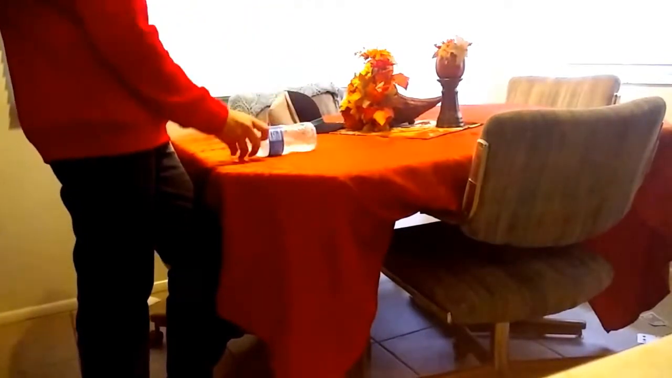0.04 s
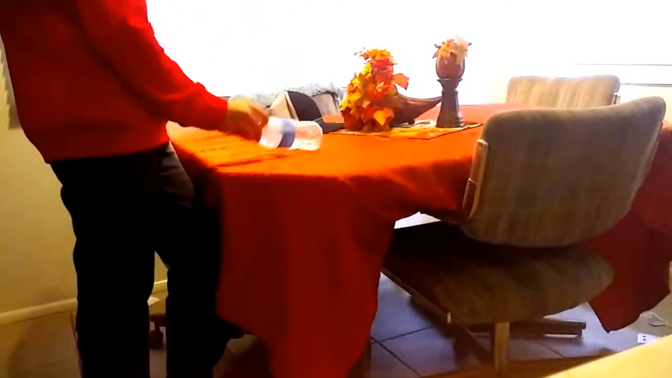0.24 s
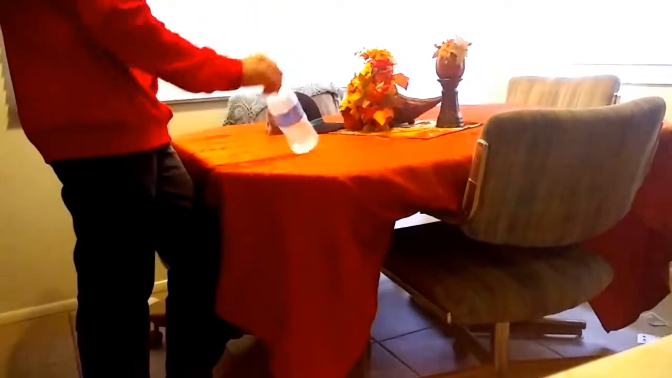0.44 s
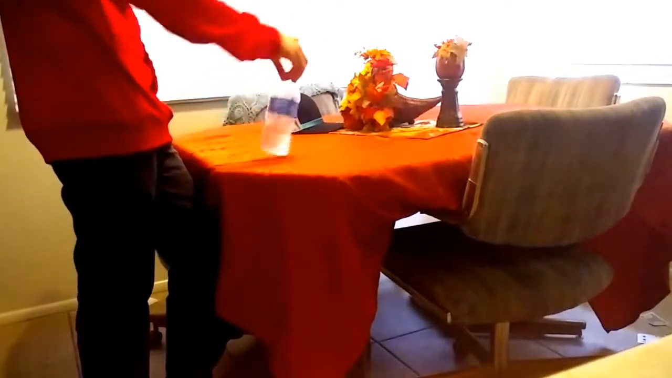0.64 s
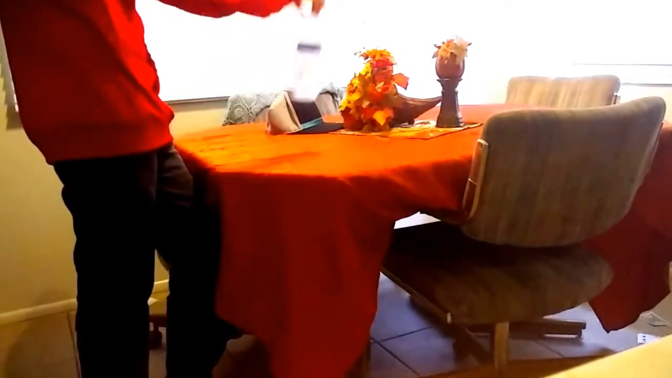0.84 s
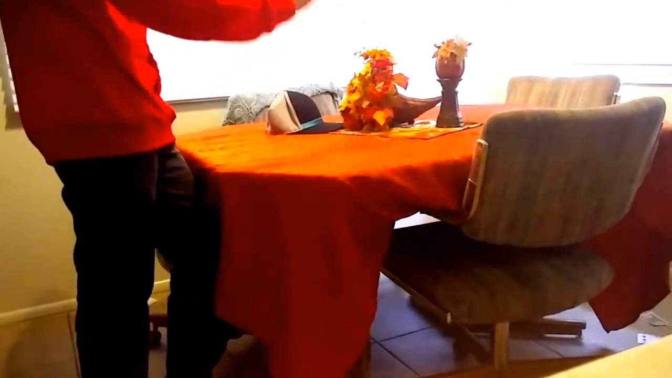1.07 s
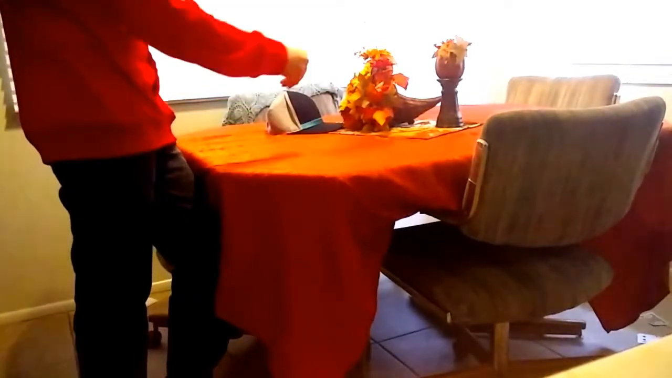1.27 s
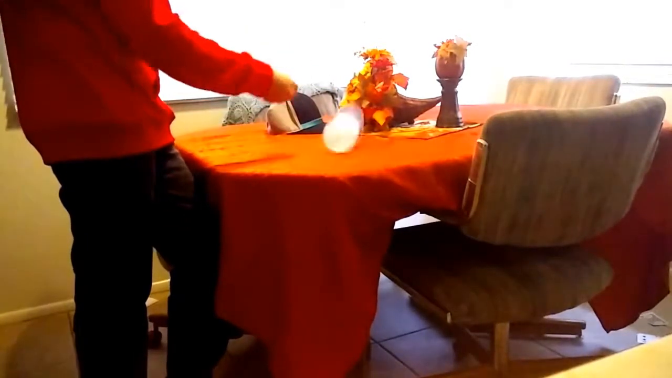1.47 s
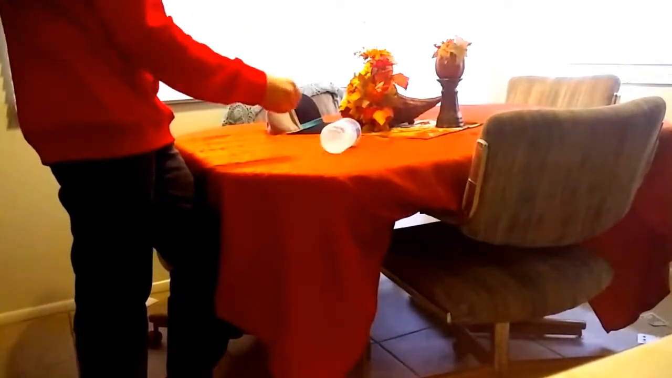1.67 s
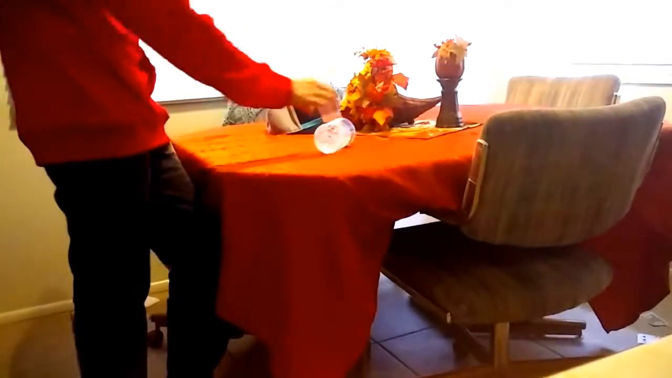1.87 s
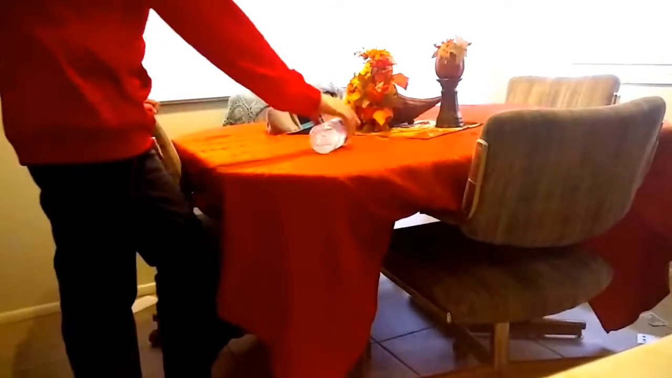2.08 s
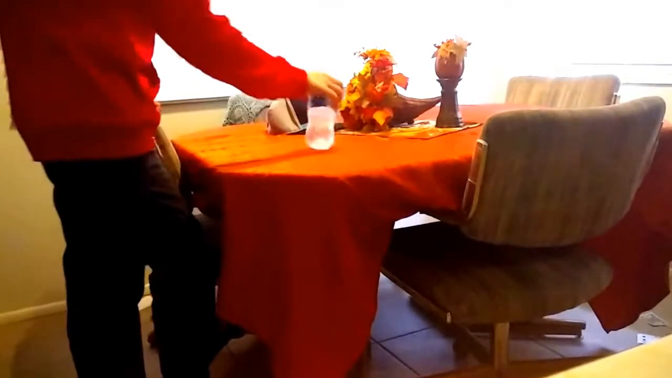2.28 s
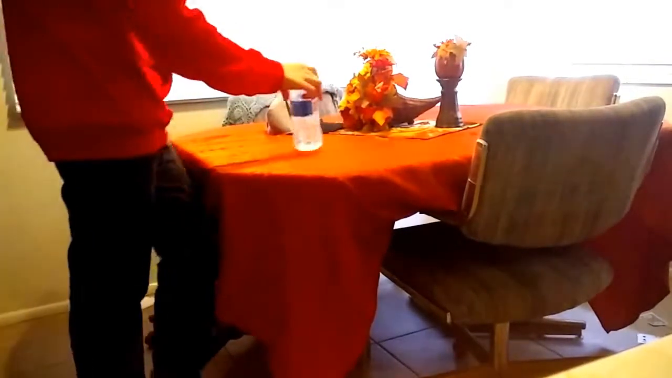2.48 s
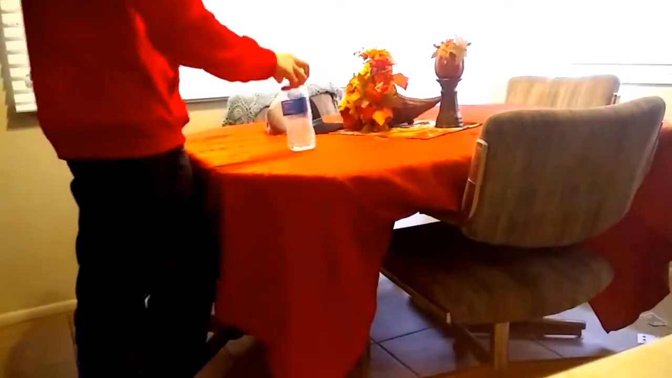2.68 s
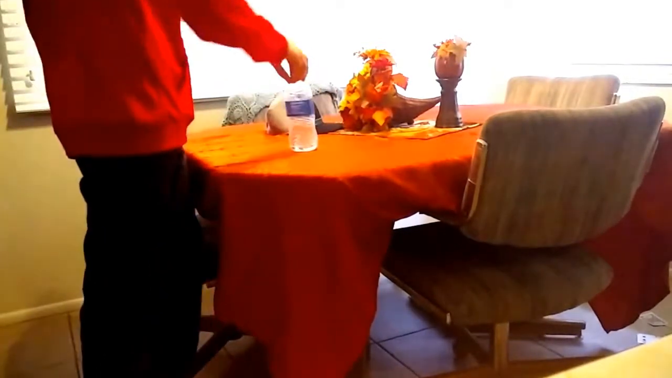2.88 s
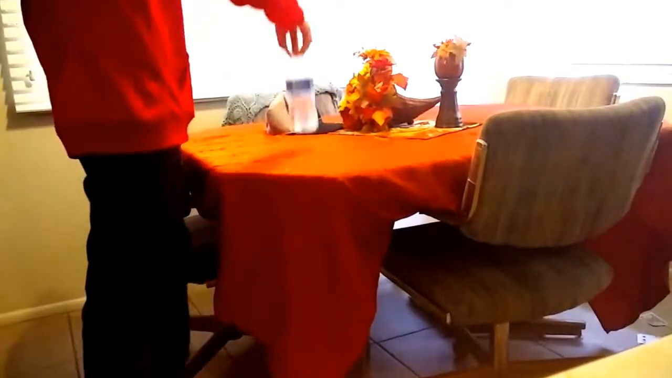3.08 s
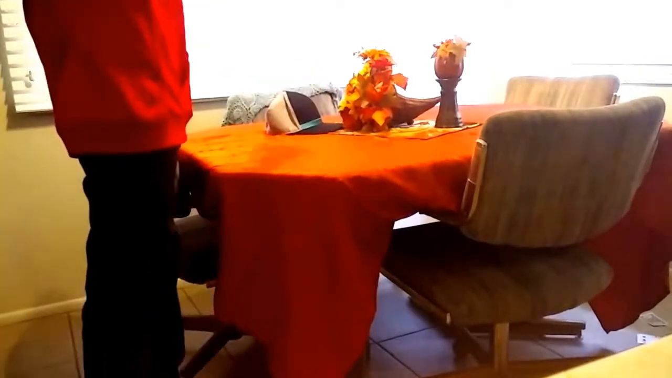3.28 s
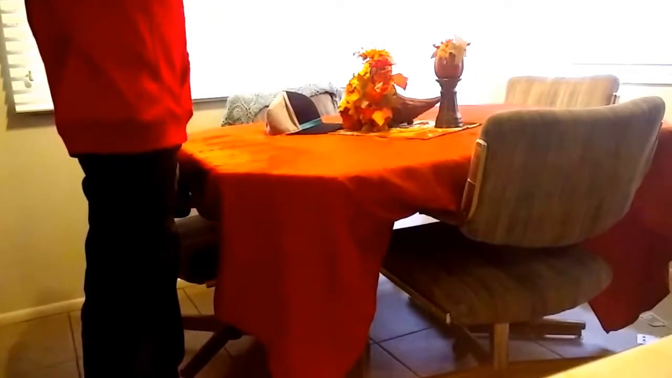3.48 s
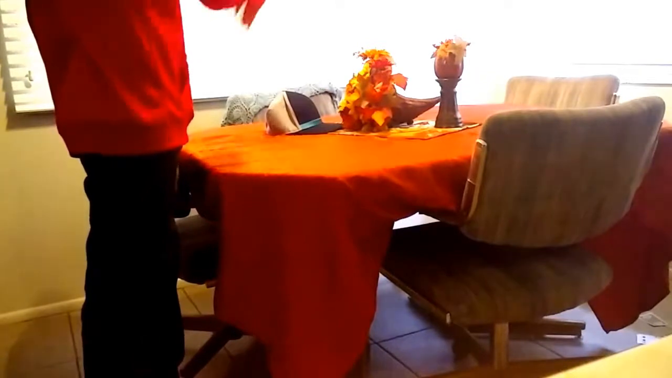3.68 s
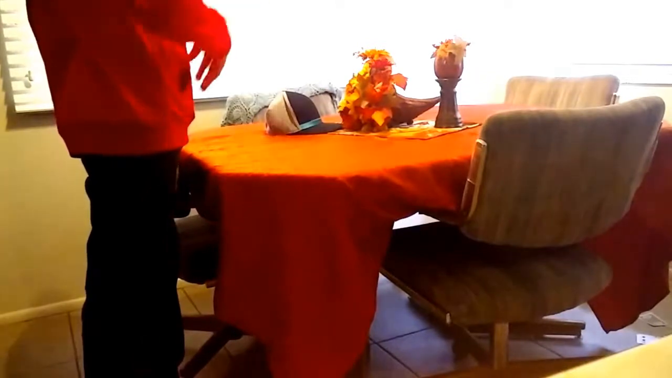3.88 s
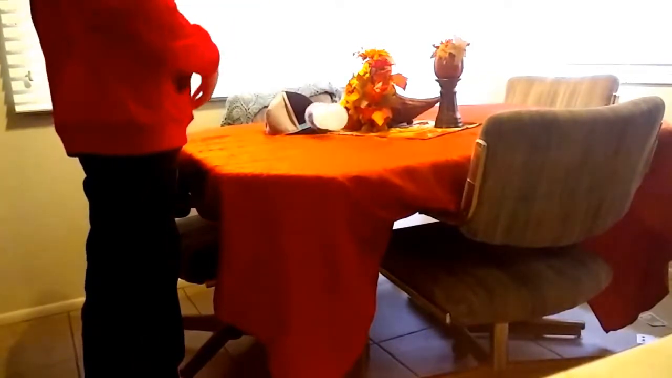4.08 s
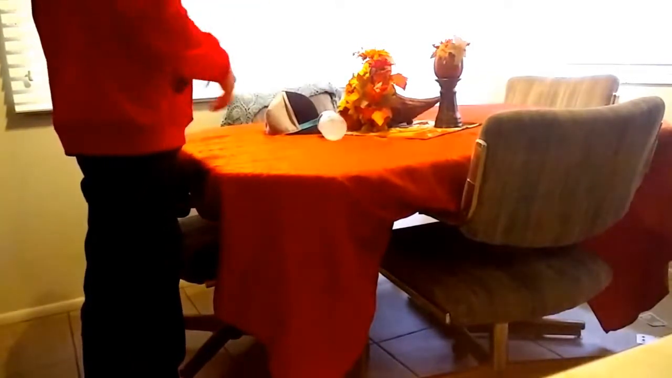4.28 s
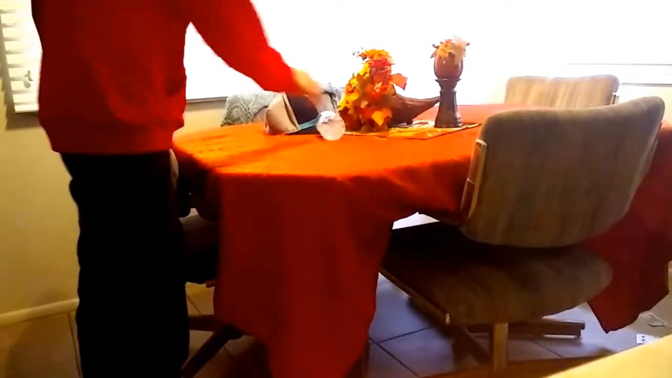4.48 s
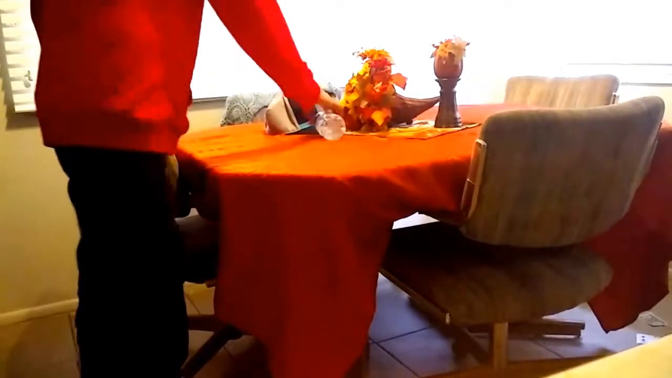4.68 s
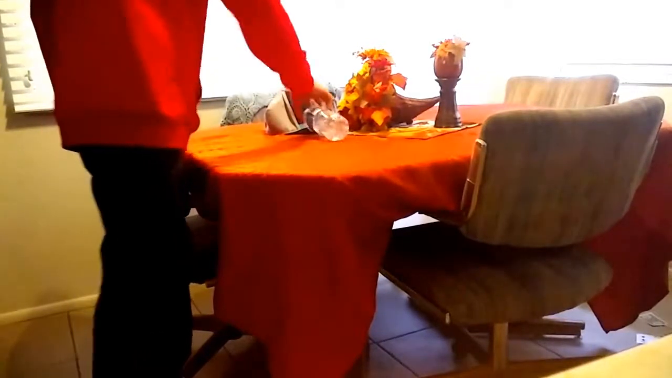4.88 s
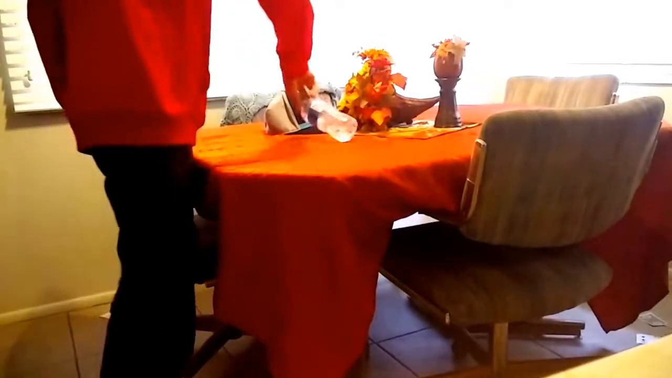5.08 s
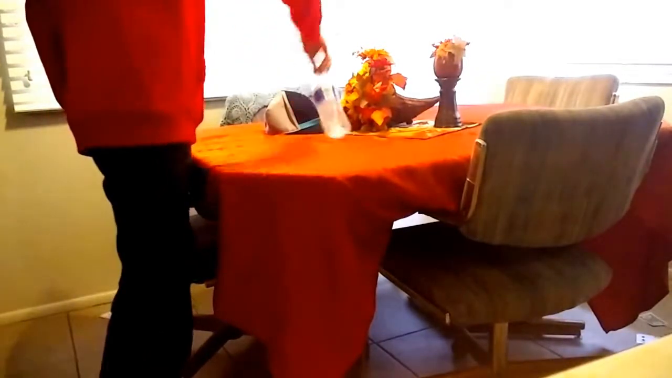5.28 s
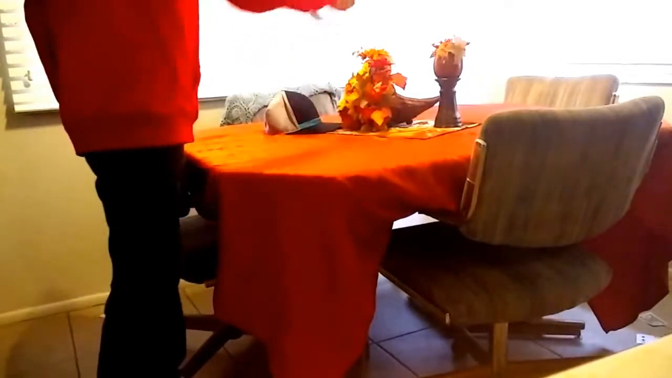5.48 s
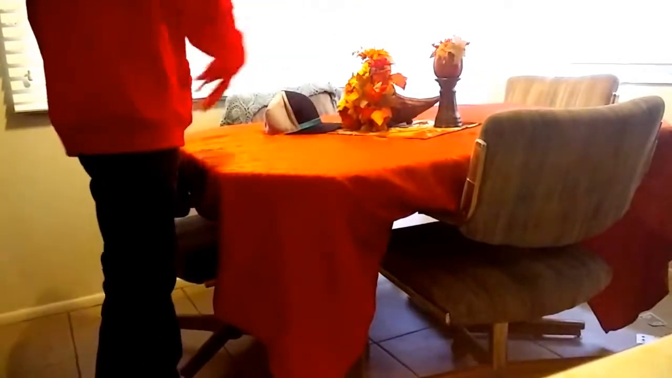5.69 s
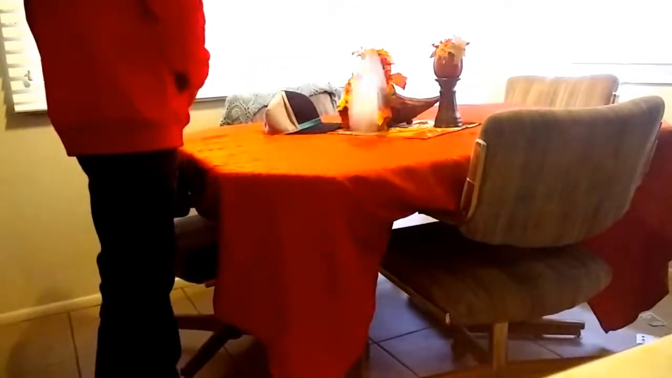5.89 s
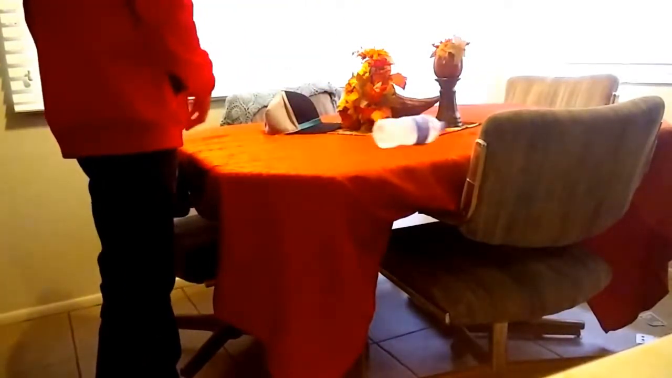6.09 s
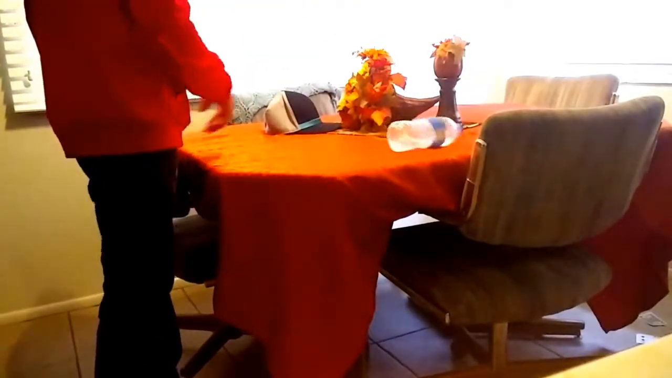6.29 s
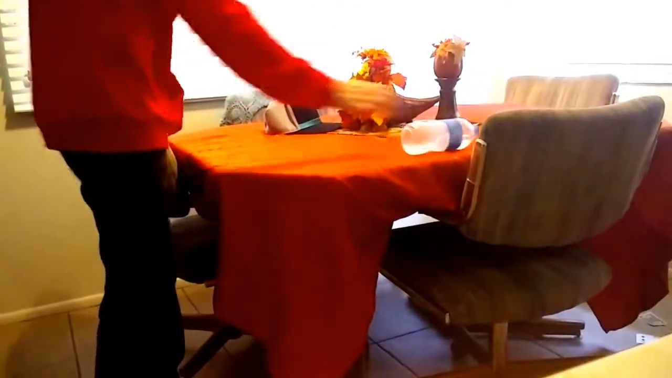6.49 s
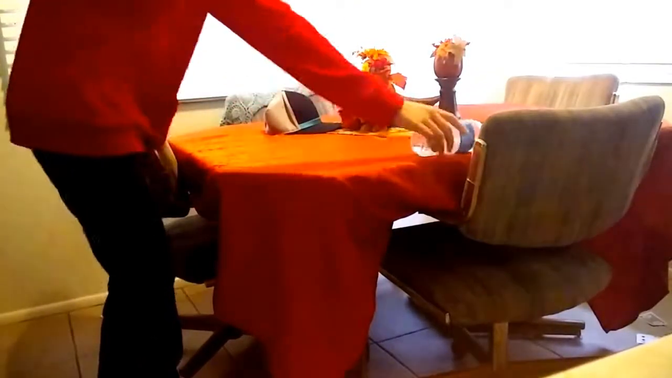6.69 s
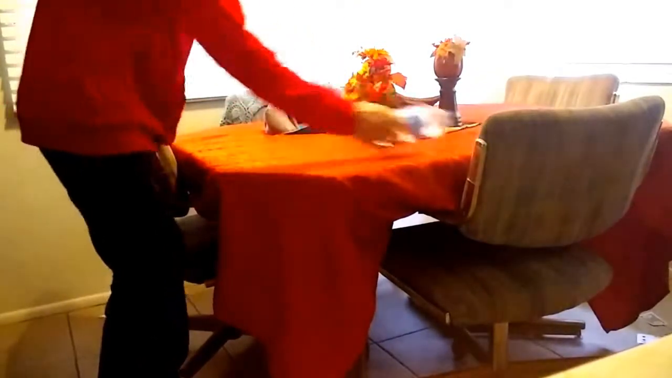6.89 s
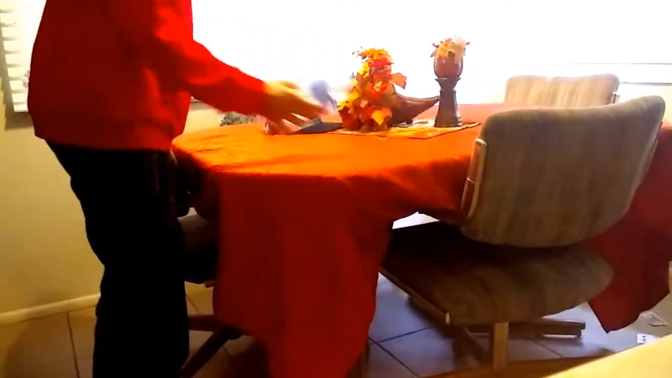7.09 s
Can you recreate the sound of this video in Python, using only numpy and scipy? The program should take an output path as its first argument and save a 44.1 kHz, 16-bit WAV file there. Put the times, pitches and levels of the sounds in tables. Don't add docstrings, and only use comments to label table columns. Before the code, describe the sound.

Three bottle flips in a reflective tiled dining room, heard from a distance by a small, hissy microphone. Each landing is a hard, hollow thud of water, plastic and wooden table, the last two with a quick bounce. Between them come faint crinkles, wall pops, light taps, trickling slosh and glugs. Low house rumble lies beneath, with a thin electric whine and quick regular ticks early on.

```python
import sys
import numpy as np
from scipy import signal
from scipy.fft import rfft, irfft
from scipy.io import wavfile
from scipy.ndimage import uniform_filter1d

SR = 44100
rng = np.random.default_rng(int(sys.argv[2]) if len(sys.argv) > 2 else 0)


def how_loud(loudness_db):
    steps = np.asarray(loudness_db, float) / 20
    return 10 ** steps


def wav_out(sig):
    wavfile.write(sys.argv[1], SR, np.round(np.clip(np.atleast_2d(sig).T, -1, 1) * 32767).astype(np.int16))


N = 314874


def evened(x):
    return x / np.sqrt(np.mean(x ** 2) + 1e-20)


def read(points, hz):
    f, value = np.transpose(points)
    return np.interp(np.log(hz + 1), np.log(f + 1), value)


def add(mix, s, sound):
    part = mix[round(s * SR):][:len(sound)]
    part += sound[:len(part)]


def coloured(x, points):
    log_gain = np.log(how_loud(read(points, np.fft.rfftfreq(4096, 1 / SR))))
    circle = np.concatenate([log_gain, log_gain[-2:0:-1]])
    taps = np.fft.ifft(np.exp(circle - 1j * signal.hilbert(circle).imag)).real
    return signal.fftconvolve(x, taps)


def noise(points, patchy_db):
    a, b, patches = rng.standard_normal((N // 256 + 5, 513, 3)).T
    patches = uniform_filter1d(patches, size=10, axis=0)
    patches = evened(uniform_filter1d(patches, size=12, axis=1))
    gain_db = read(points, np.fft.rfftfreq(1024, 1 / SR))[:, None]
    z = (a + 1j * b) * how_loud(gain_db + patchy_db * patches)
    return evened(signal.istft(z, nperseg=1024, noverlap=768)[1][:N])


# f/Hz, T60/s
ROOM = [(60, 0.55), (160, 0.34), (420, 0.34), (1100, 0.33), (2910, 0.36), (7680, 0.33)]


def room(x, direct_db=-11, late_db=-16, slower=1.75):
    hz, t, z = signal.stft(rng.standard_normal(SR * 3 // 4), SR, nperseg=256)
    t60 = read(ROOM, hz)[:, None]
    filling = 1 - np.exp(-(t + 0.0015) / (0.0023 + 1.0 / (hz[:, None] + 100)))
    decay = how_loud(-60 * t / t60) + how_loud(late_db - 60 * t / t60 / slower)
    tail = signal.istft(z * filling * decay, SR, nperseg=256)[1]
    seconds = np.arange(len(tail)) / SR
    tail *= np.clip(seconds / .0008, 0, 1) / np.linalg.norm(tail)
    early = np.exp(-seconds / .08)
    clumps = np.repeat(rng.standard_normal(len(tail) // 90 + 1), 90)[:len(tail)]
    tail *= how_loud(3.0 * early * uniform_filter1d(clumps, size=40))
    tail[0] += how_loud(direct_db)
    return signal.fftconvolve(x, tail)


# f/Hz, level/dB per Hz
RUMBLE = [(15, -58.5), (25, -38), (48, -14), (113, -10), (147, -23.5), (229, -1.5), (351, -11.5),
          (385, -13), (488, -11.5), (944, -17), (1010, -19), (1140, -21), (2050, -25), (2200, -24),
          (7000, -39), (9100, -72.5), (15400, -120)]
# f/Hz, level/dB
HUM = [(59.2, -81.5), (118.4, -76), (177.6, -77), (479, -84)]


def house():
    t = np.arange(N) / SR
    hum = sum(np.sqrt(2) * how_loud(db) * np.sin(2 * np.pi * (hz * t + rng.random())) for hz, db in HUM)
    return how_loud(-61.5) * noise(RUMBLE, patchy_db=2.37) + hum


def leak_db(t):
    warm_db, warm_s = 3.5, 0.17
    dropout_s, dropout_length_s, cut_s = .46, .09, 4.11
    gap = (t > dropout_s) & (t < dropout_s + dropout_length_s)
    sag = 1.65 * np.minimum(t, cut_s)
    return 5 - sag + warm_db * np.exp(-t / warm_s) - 9 * gap - 18 * (t > cut_s)


# f/Hz, level/dB per Hz
HISS = [(1470, -28), (2500, -1.5), (3300, -6), (3560, -3), (4660, -14.5), (5070, -7.5), (8960, -4.5),
        (12300, -11), (15700, -6.5)]


def hiss():
    strong_leak = np.maximum(leak_db(np.arange(N) / SR), 0)
    return how_loud(-75.5 + uniform_filter1d(strong_leak, size=8000)) * noise(HISS, patchy_db=1.2)


# f/(1000.2 Hz), level/dB
WHINE = [(1, -85), (2, -84), (7, -95.5), (8, -99.5), (9, -90.5), (10, -91.5), (13, -90.5), (14, -95.5),
         (15, -98)]


def clock_whine():
    t = np.arange(N) / SR
    flutter = 1 + 0.25 * evened(uniform_filter1d(rng.standard_normal(N), size=300))
    whine = sum(np.sqrt(2) * how_loud(db) * np.sin(2 * np.pi * (round(k) * 1000.2 * t + rng.random()))
                for k, db in WHINE)
    return how_loud(leak_db(t)) * flutter * whine


def clock_ticks():
    first_s, every_s, last_s, weak_after_s = .0165, .08, 2.75, 1.9
    level_db, spread_db, weak_db = -61, 1.5, -11
    times = np.arange(first_s, last_s, every_s)
    levels = level_db + spread_db * rng.standard_normal(len(times)) + weak_db * (times > weak_after_s)
    stray = (2.2558, -57.5)  # t/s, level/dB
    out = how_loud(leak_db(np.arange(N) / SR) - 84.5) * rng.standard_normal(N)
    for s, db in [*zip(times, levels), stray]:
        add(out, s, how_loud(db) * rng.standard_normal(500) * np.exp(-np.arange(500) / SR / .004))
    return signal.sosfilt(signal.butter(2, 6500, "high", fs=SR, output="sos"), out)


def camera():
    return hiss() + clock_whine() + clock_ticks()


# f/Hz, level/dB per Hz
FADING = [(35, -61), (60, -62), (206, -6), (790, -3), (1500, -8.5), (1840, -16), (3900, -16), (5620, -29),
          (14000, -59)]


def earlier_landing():
    fade_db_per_s = 137
    return how_loud(-41.5 - fade_db_per_s * np.arange(N) / SR) * noise(FADING, patchy_db=-3.0)


# f/Hz, level/dB per Hz
CRACKLE = [(200, -33), (1000, 2), (3000, -4.5), (6500, -10), (9000, -21), (13000, -32)]


def crinkle(db, hz, broad_db, length, sharp, swell, direct_db):
    u = np.arange(round(8 * length * SR) + 400) / SR / length
    rattle = rfft(rng.standard_normal(len(u)) * u ** swell * np.exp(-u), 2 * len(u))
    rattle = irfft(rattle / abs(rattle) ** .8)[:len(u)]
    mode = signal.iirpeak(hz, sharp, SR)
    ring = signal.lfilter(*mode, signal.lfilter(*mode, rattle))
    broad = coloured(rattle, CRACKLE)
    ring = np.pad(ring, (0, len(broad) - len(ring)))
    ring = signal.lfilter(*signal.butter(2, 9500, fs=SR), ring)
    both = ring / np.linalg.norm(ring) + how_loud(broad_db) * broad / np.linalg.norm(broad)
    return how_loud(db) * room(both, direct_db)


def crinkles(rows, level_db, sharp, swell, direct_db):
    out = np.zeros(N)
    for s, *row in rows:
        add(out, s, how_loud(level_db) * crinkle(*row, sharp, swell, direct_db))
    return out


# t/s, level/dB, ring f/Hz, length/s
BUMPS = [(0.23, -46, 196, 0.015), (0.355, -48, 200, .008), (0.689, -48, 306, 0.0061),
         (1.643, -19.5, 245, 0.015), (1.71, -47, 241, 0.0058), (2.021, -44.5, 245, 0.0078),
         (2.242, -48.5, 250, 0.0085), (2.648, -36, 253, 0.0097), (2.825, -44.5, 237, 0.0091),
         (3.12, -51, 226, 0.0082), (3.564, -46, 250, 0.022), (4.841, -47, 220.4, 0.015),
         (5.233, -48, 220, .013), (5.741, -44, 228, 0.01), (6.189, -30, 341, 0.0099),
         (6.22, -39, 392, .016)]


def bumps():
    rows = [(s, db, hz, -20, length) for s, db, hz, length in BUMPS]
    return crinkles(rows, level_db=21, sharp=3.0, swell=.4, direct_db=-6)


# t/s, level/dB, ring f/Hz, crackle level/dB, length/s
RUSTLES = [(.125, -59, 7300, -7, 0.0081), (.2, -54.5, 7450, -1, 0.017), (.24, -58, 9800, -19, 0.018),
           (.33, -59, 7600, -1, 0.0088), (.458, -60, 4140, -9, 0.0047), (1.19, -66.5, 6200, 11, 0.0065),
           (2.31, -64, 6900, -1, 0.052), (2.732, -63.5, 9300, 1, 0.0051), (5.295, -64.5, 6500, 4.5, 0.0068),
           (5.435, -62.5, 6650, 9, 0.0079), (5.72, -53, 6300, -2, 0.05), (5.86, -45.5, 5400, -16, 0.0065),
           (5.86, -55, 3780, -15, 0.0047), (6.77, -71, 6060, 16.5, 0.012),
           (6.905, -60.5, 5860, -8.5, 0.0053), (7.06, -56.5, 6900, -2, 0.02)]


def rustles():
    return crinkles(RUSTLES, level_db=22, sharp=4.0, swell=.6, direct_db=-5)


# t/s, level/dB, ring f/Hz
SNAPS = [(2.221, -61.5, 5640), (2.322, -65, 5000), (2.397, -63, 5200), (2.453, -62, 5430),
         (2.782, -65, 7000), (4.417, -53, 7400), (4.465, -53, 5700), (5.441, -65, 5500),
         (5.503, -65.5, 5150), (6.43, -73, 5580), (6.766, -67, 5770), (6.777, -66.5, 6160),
         (6.783, -65.5, 5130), (6.972, -73.5, 6250), (7.051, -62, 5800), (7.06, -59, 7260),
         (7.075, -62, 6950)]


def snaps():
    rows = [(*row, -11, .0008) for row in SNAPS]
    return crinkles(rows, level_db=9, sharp=7.0, swell=.1, direct_db=8)


# t/s, level/dB, ring f/Hz, crackle level/dB, length/s
POPS = [(0.4584, -53, 2980, -1, 0.0046), (1.1856, -46.5, 2840, -31, 0.022), (1.19, -55, 3103, -9.5, 0.012),
        (2.447, -63.5, 2730, 4.5, 0.029), (2.516, -52.5, 2780, -13, 0.0078),
        (5.434, -62, 3330, 8.5, 0.0039), (5.711, -42, 2570, -10.5, 0.018), (5.767, -51, 2800, -14, 0.02),
        (5.8257, -36, 2590, 0, 0.0053), (5.8644, -62, 2550, 5, 0.0089), (6.909, -57, 2430, -17, 0.0089),
        (6.9716, -47, 2540, -13.5, 0.0077), (7.111, -55, 2750, 2, 0.014)]


def wall_pops():
    return crinkles(POPS, level_db=21, sharp=3.5, swell=.05, direct_db=-4)


# t/s, level/dB, ring f/Hz, length/s
CREAKS = [(1.186, -50.5, 2160, 0.0072), (1.196, -44, 1085, 0.0044), (1.496, -52, 2250, .008),
          (1.584, -19.5, 895, .006), (1.6, -24, 552, 0.0068), (4.126, -20, 954, 0.0036),
          (4.14, -22.5, 2490, .005), (4.323, -29, 954, 0.0044), (2.311, -52.5, 955, .004),
          (2.671, -55, 2490, .003), (4.137, -20, 765, .005), (4.335, -30.5, 1540, 0.0061),
          (5.859, -46, 3820, .006), (6.169, -27, 1320, 0.003)]


def creaks():
    rows = [(s, db, hz, -24.5, length) for s, db, hz, length in CREAKS]
    return crinkles(rows, level_db=20, sharp=12., swell=.3, direct_db=-3)


# t/s, level/dB, ring f/Hz, length/s
GLUGS = [(0.13, -55, 510, .006), (.198, -49, 484, .008), (0.23, -53.5, 470, 0.0041), (.345, -53, 560, .012),
         (1.195, -44.5, 865, 0.0034), (2.33, -58, 1300, 0.015), (5.408, -40, 880, 0.02),
         (5.453, -51.5, 810, 0.0057), (5.702, -52, 1050, 0.013), (5.824, -39, 1460, 0.0074),
         (6.794, -56, 1100, 0.0086), (7.097, -54, 760, 0.015)]


def glugs():
    rows = [(s, db, hz, -21.5, length) for s, db, hz, length in GLUGS]
    return crinkles(rows, level_db=22, sharp=2.5, swell=.2, direct_db=-7)


# start t/s, length/s, level/dB
SLOSH = [
    (2.178, 0.53, -66),
    (4.35, 0.23, -64),
    (5.705, 0.23, -72),
    (6.725, 0.63, -66.5),
]


def slosh(per_s=30):
    out = np.zeros(N)
    for hz in np.geomspace(800, 3900, num=14):
        turns = np.arange(round(14 * SR / hz)) * hz / SR
        bubble = np.sin(2 * np.pi * turns * (1 + 0.013 * turns)) * turns * np.exp(-turns / 1.7)
        strength = how_loud(2.5 * rng.exponential(size=N).clip(0, 4))
        births = (rng.random(N) < per_s / SR) * strength
        out += signal.oaconvolve(births, bubble)[:N]
    t, flow = np.arange(N) / SR, np.zeros(N)
    rise_s, fall_s = 0.079, 0.12
    for s, length, db in SLOSH:
        swell = np.clip((t - s) / rise_s, 0, 1) * np.clip((s + length - t) / fall_s, 0, 1)
        flow += how_loud(db) * swell ** 2
    return flow * evened(room(out, direct_db=3.0)[:N])


def rocking(width_hz=140):
    start_s, rise_s, fade_db_per_s = 6.375, .03, 80
    start_hz, sag_hz_per_s, rest_hz = 335, 450, 250
    t = np.clip(np.arange(N) / SR - start_s, 0, 1)
    turn = np.exp(2j * np.pi * np.cumsum(np.maximum(start_hz - sag_hz_per_s * t, rest_hz)) / SR)
    wobble = rng.standard_normal((N, 2)) @ [1, 1j]
    wobble = signal.lfilter([1], [1, -np.exp(-np.pi * width_hz / SR)], wobble)
    wobble = signal.lfilter([1], [1, -np.exp(-2 * np.pi * width_hz / SR)], wobble)
    fade_db = fade_db_per_s * np.maximum(t - rise_s, 0)
    swing = np.minimum(t / rise_s, 1) ** 2 * how_loud(-51.5 - fade_db)
    return swing * evened((turn * wobble).real)


# f/Hz, level/dB, T60/s
TABLE_MODES = [(68, -8.5, .5), (97.8, -8.5, 0.23), (175.4, -13, 0.11), (226, 0.9, 0.28), (250, 0.7, 0.14),
               (302, -10, .2), (355, -5.5, 0.53), (413, -3.5, 0.35), (468, -14.5, 0.044), (547, -5, 0.23),
               (669, -11, .2), (831, -8, 0.18)]


def table_top(boom_db, body_db):
    t = np.arange(16000) / SR
    ring = np.zeros(len(t))
    for k, (f, db, t60) in enumerate(TABLE_MODES):
        thump_db = -13.5
        drive_db = thump_db if f < 150 else boom_db if f < 320 else body_db
        ring += (-1) ** k * how_loud(db + drive_db - 60 * t / t60) * np.sin(2 * np.pi * f * t)
    return ring * (1 - np.exp(-t / 0.0022))


# f/Hz, level/dB per Hz
CLICK = [(400, -15.5), (1200, -1), (3500, -2.5), (6000, -2.5), (8500, -22), (11000, -33), (15000, -55.5)]


def contact_click():
    chatter = rfft(rng.standard_normal(220) * np.exp(-np.arange(220) / SR / .002), 440)
    click = coloured(irfft(chatter / abs(chatter))[:220], CLICK)
    return click / np.linalg.norm(click)


def closed(colour):
    low_db, high_db = colour[0][1], colour[-1][1]
    above = [(7780, high_db - 17.5), (11000, high_db - 33), (15000, high_db - 45.5)]
    return [(47, low_db - 30.5)] + list(colour) + above


def blow(colour, db, boom_db, body_db, click_db):
    slap = coloured([1.], colour)
    sound = how_loud(27.5) * room(slap / np.linalg.norm(slap), direct_db=-27)
    add(sound, 0, how_loud(-2.5) * table_top(boom_db, body_db))
    add(sound, 0, how_loud(click_db + 27) * contact_click())
    return how_loud(db) * sound


# t/s, water slap level/dB, then against it table boom, table body, click level/dB
BLOWS = [
    [(1.5793, -16.5, -3.5, -8, -17.5), (1.600, -16.5, 4.5, -5, -34)],
    [(2.669, -45, -15, 2, -35)],
    [(4.1173, -11.5, -20, -9.5, -19), (4.1365, -11.5, -1.5, -12, -10)],
    [(4.3215, -24.5, -18, -9.5, -10.5)],
    [(6.063, -21.5, -41, -1, -23.5), (6.073, -22, -5, 1, -29)],
    [(6.162, -21, -18, -7.5, -12)],
]
# f/Hz, level/dB per Hz
COLOURS = [
    [(151, -19.5), (239, -8.5), (363, -19), (493, -11.5), (655, -16), (1060, -16.5), (3700, -29.5),
     (5700, -30.5)],
    [(100, -18), (370, -19), (786, -4), (910, -16), (1220, -14.5), (1670, -30), (2600, -20.5), (3410, -38)],
    [(100, -15.5), (205, -0.5), (370, -15.5), (560, -3.5), (1010, -7), (1500, -11), (2500, -13),
     (6200, -19.5)],
    [(150, -5.5), (700, -4), (1000, -1), (1550, -1.5), (2280, -10.5), (3300, -6), (4300, -18.5),
     (6200, -20)],
    [(100, -9), (229, -14.5), (347, -8), (423, -3), (684, -11), (833, -5.5), (1350, -12), (5480, -20)],
    [(110, -28.5), (325, -5.5), (363, -0.5), (400, -12), (600, -7), (747, -12.5), (1040, -7), (5850, -22)],
]


def landings():
    out = np.zeros(N)
    for colour, rows in zip(COLOURS, BLOWS):
        for s, *levels in rows:
            add(out, s, blow(closed(colour), *levels))
    return out


def bottle():
    handling = bumps() + rustles() + snaps() + wall_pops() + creaks()
    water = glugs() + slosh()
    return earlier_landing() + handling + water + rocking() + landings()


def scene():
    return (house() + camera() + bottle())[None]


def band_limit(x):
    return signal.sosfilt(signal.butter(12, 16340, fs=SR, output="sos"), x)


def record(dry):
    thin = signal.sosfilt(signal.butter(3, 55, "high", fs=SR, output="sos"), dry)
    edge = signal.firwin(511, 15760, window=("kaiser", 9), fs=SR)
    return band_limit(signal.oaconvolve(thin, edge[None], "same"))


dry = scene()
out = record(dry)
wav_out(out)
```